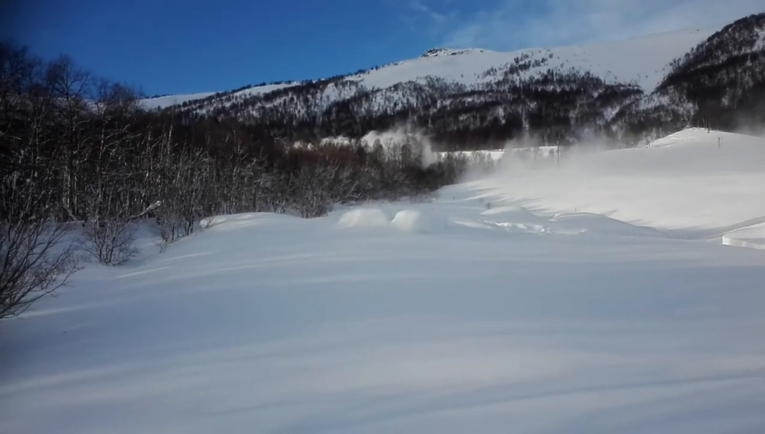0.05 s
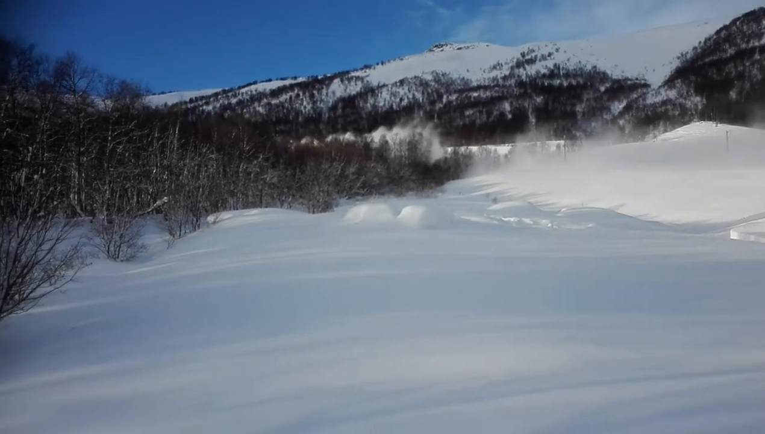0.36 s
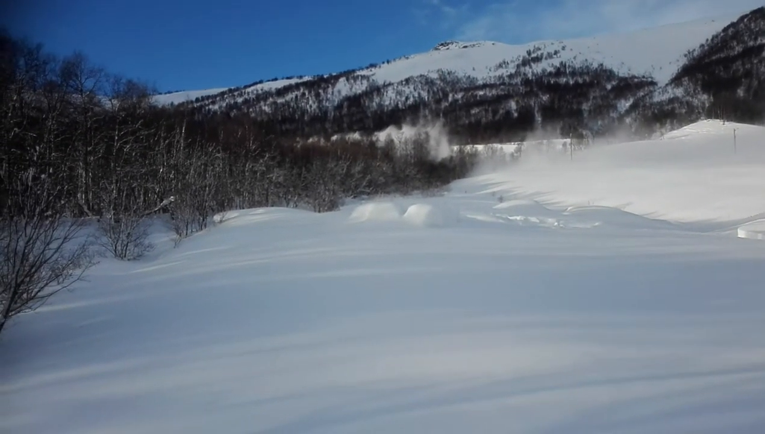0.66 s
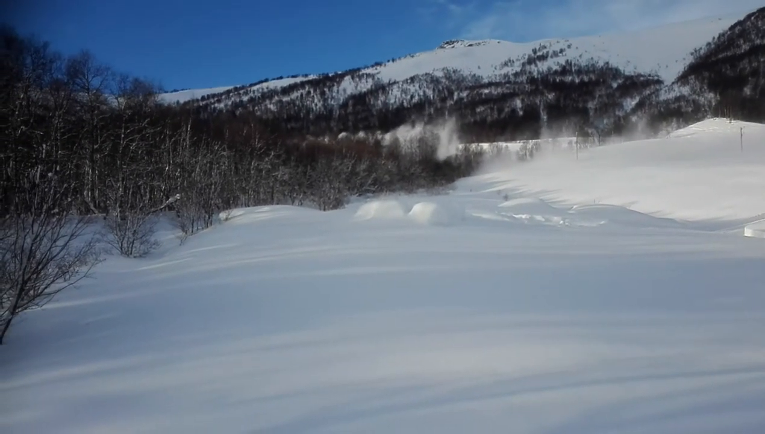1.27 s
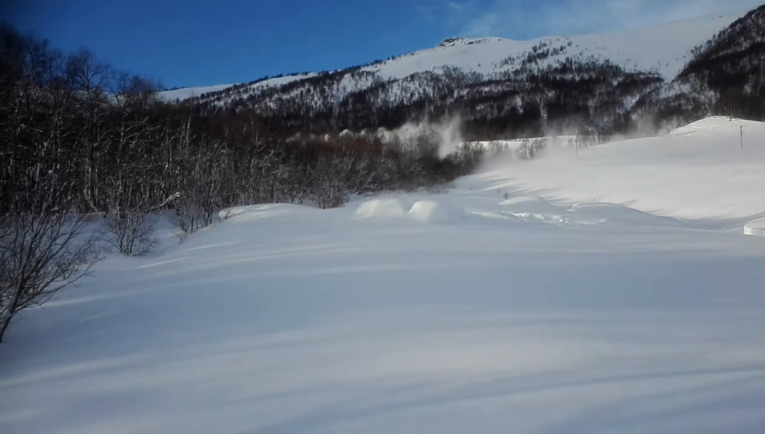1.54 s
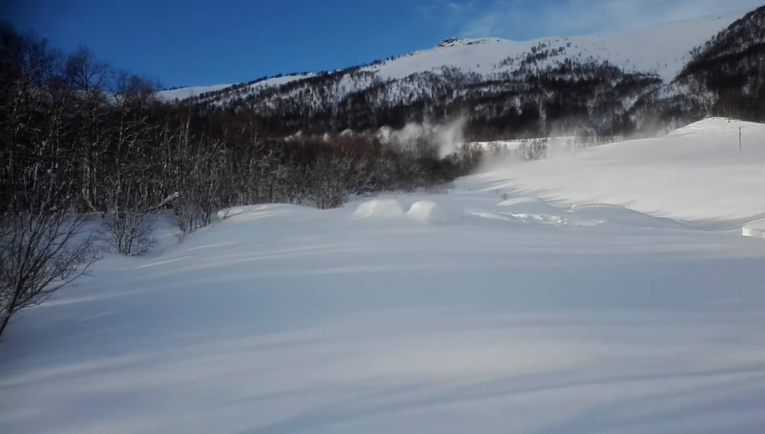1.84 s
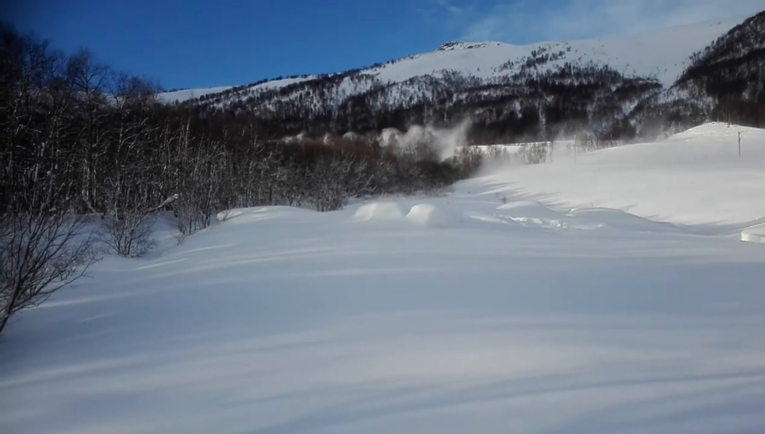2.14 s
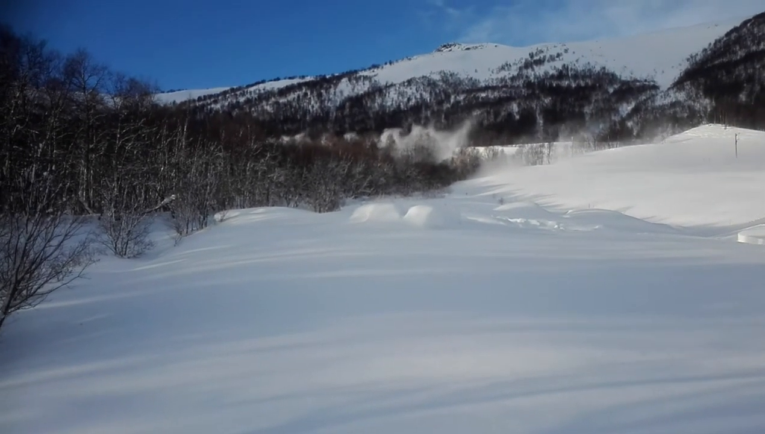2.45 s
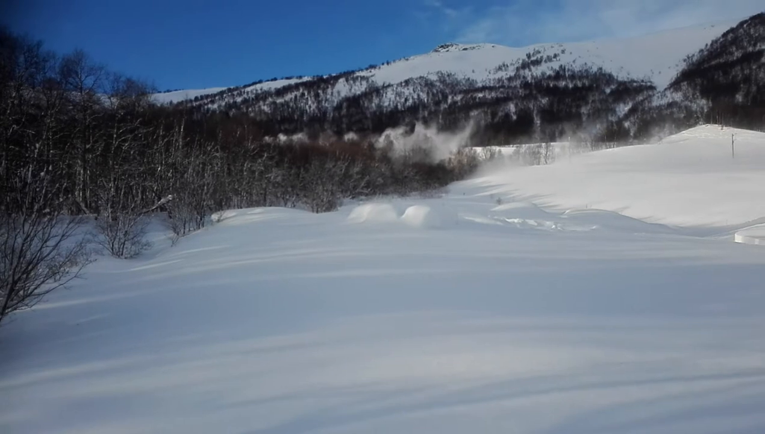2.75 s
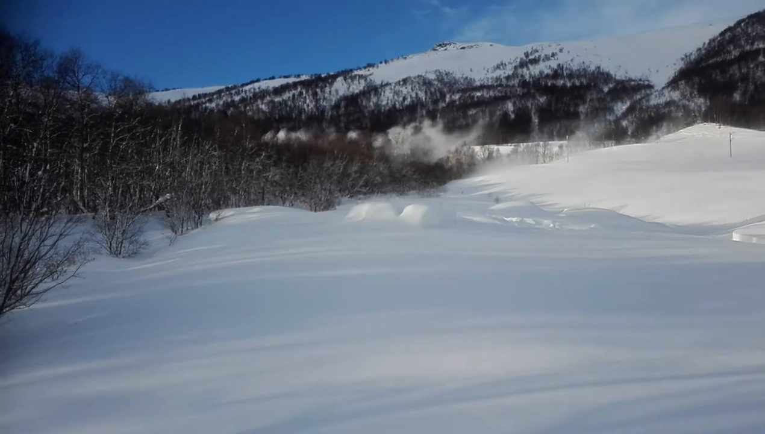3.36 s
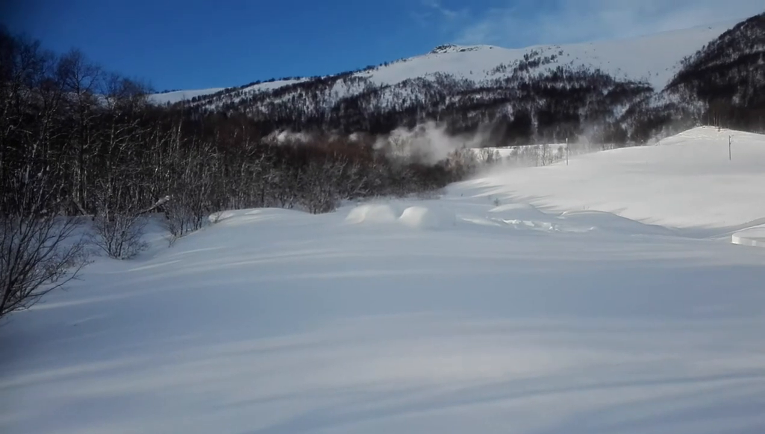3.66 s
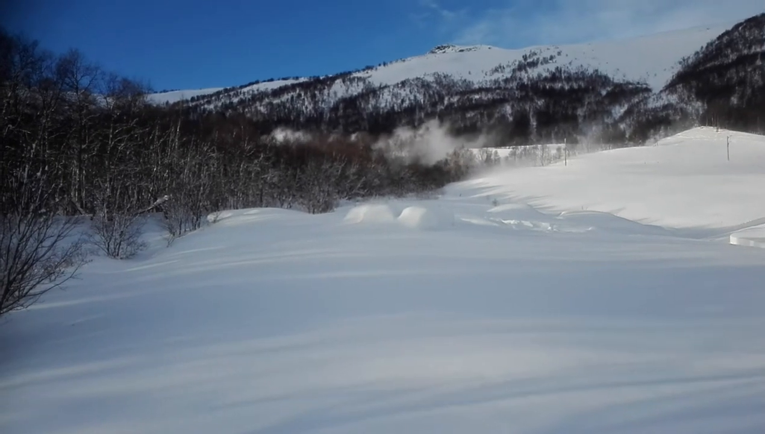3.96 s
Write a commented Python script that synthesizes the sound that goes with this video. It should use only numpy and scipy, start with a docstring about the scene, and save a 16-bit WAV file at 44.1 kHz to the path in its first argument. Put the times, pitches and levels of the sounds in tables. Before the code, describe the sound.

A low, wavering drone of far-off diesel engines carries over a snowfield. A hissing gust rises and fades, then a brighter one follows with brief whistles, as wind rumbles and thuds harder against the microphone.

```python
"""From the start two far diesel engines drone across a snowy valley; they run at slightly different
speeds, so their exhaust harmonics beat. About a second in, a gust sweeps loose snow over the slope
with a hiss that brightens as it grows, and brief airy whistles come and go. From two seconds on,
the eddies that buffet the microphone thud harder. A second, brighter gust peaks near 2.5 s
and sinks back while the drone and the thuds go on."""
import sys
import numpy as np
from scipy import signal
from scipy.fft import rfft, irfft
from scipy.io import wavfile
from scipy.ndimage import uniform_filter1d

SR = 44100
rng = np.random.default_rng(int(sys.argv[2]) if len(sys.argv) > 2 else 0)


def store_wav(level_fs):
    """Save 16-bit WAV to argv[1]."""
    pcm = np.round(np.clip(np.atleast_2d(level_fs), -1, 1) * 32767)
    wavfile.write(sys.argv[1], SR, pcm.T.astype(np.int16))


N = 176400
TIME, FREQ = np.arange(N) / SR, np.fft.rfftfreq(N, 1 / SR)

# Spectrum of the engines' diffuse roar: frequency_hz, relative_db
ROAR_SPECTRUM = [(20, -38.5), (85, -19), (120, -11), (160, -8.5), (215, 0.5), (300, -2.5), (360, -12),
                 (500, -13.5), (700, -23), (1500, -48.5)]


def engines():
    """Beating: harmonics of two nearly equal cycle rates interfere, over a dull roar and a faint whine."""
    # Exhaust harmonics of each engine: multiple_of_cycle_rate, level_db
    slow_harmonics = [(12, -49.5), (18, -73), (20, -58.5), (22, -53.5), (24, -52.5), (26, -60.5),
                      (28, -63.5), (30, -51.5), (32, -71), (33, -74), (34, -55.5), (36, -74), (42, -63),
                      (48, -65)]
    fast_harmonics = [(12, -48.5), (14, -59.5), (18, -55.5), (21, -52.5), (22, -52), (24, -60), (26, -60.5),
                      (28, -68), (34, -72), (43, -60.5), (48, -69.5)]
    # How the wind carries the engines' body and, differently, their deep firing tones: time_s, gain_db
    body_carry = [(0, 1.5), (.65, 2), (1.3, -.5), (1.8, -2.5), (2.2, 0), (2.6, 0), (3.4, -1), (4, -1.5)]
    firing_carry = [(0, 2), (.7, 0.5), (1.4, -2), (1.75, -4.5), (2.1, 2), (2.55, 4.5), (3, 1), (3.45, -8),
                    (3.9, 4)]
    # A higher engine tone that comes and goes: time_s, level_db
    whine_level = [(0, -55), (.45, -69.5), (1.2, -59.5), (1.5, -61.5), (1.9, -81), (2.5, -73), (3, -61),
                   (3.3, -74), (3.7, -60), (4, -74)]
    slow_cycle_hz, fast_cycle_hz, cylinders, speed_wander = 9.296, 9.743, 12, 0.00083
    phases = rng.random(size=128)
    exhaust, weak_lines = np.zeros(N), np.zeros(N)
    for cycle_hz, harmonics in ((slow_cycle_hz, slow_harmonics), (fast_cycle_hz, fast_harmonics)):
        clock = TIME + speed_wander * np.cumsum(drift(rate_hz=1.74)) / SR
        for order, level_db in harmonics:
            partial = gain_of(level_db) * distant_tone(order * cycle_hz, clock, phases[order], 0.73)
            exhaust += partial * envelope(firing_carry if order == cylinders else body_carry)
        weak_lines += cylinder_clatter(cycle_hz, clock)
    # The whine drifts in pitch with the same slow speed wander as the engines.
    whine = envelope(whine_level) * distant_tone(612.9, clock, rng.random(), fading_db=8)
    roar = gain_of(-47.5) * noise(colour(ROAR_SPECTRUM)) + gain_of(-51) * unit_rms(weak_lines)
    return exhaust + roar * envelope(body_carry) + whine


def distant_tone(pitch_hz, clock, phase_turns, fading_db):
    """Atmospheric fading: moving air makes the level of a far partial waver."""
    fading = gain_of(fading_db * drift(rate_hz=1.25))
    return np.sqrt(2) * np.sin(2 * np.pi * (pitch_hz * clock + phase_turns)) * fading


def cylinder_clatter(cycle_hz, clock, size=4096, spread_db=3.5):
    """Periodicity: uneven cylinders repeat one dull pattern every cycle, giving many spectral lines."""
    line_hz = np.fft.rfftfreq(size, 1 / size) * cycle_hz
    unevenness = gain_of(spread_db * rng.standard_normal(len(line_hz)))
    amplitudes = np.interp(line_hz, FREQ, colour(ROAR_SPECTRUM)) * unevenness
    cycle = irfft(amplitudes * np.exp(2j * np.pi * rng.random(len(line_hz))))
    return unit_rms(np.interp(clock * cycle_hz, np.arange(size) / size, cycle, period=1))


def gusts():
    """Flow noise: wind and drifting snow sound in four broad bands that swell with each gust."""
    # Course of the low rush, middle sough, treble hiss and top fizz: time_s, relative_db
    rush_level = [(0.0, -49.5), (0.41, -58), (1.1, -47.5), (1.56, -61), (1.66, -62), (2.38, -58.5),
                  (2.61, -43.5), (2.66, -47), (2.97, -54), (2.98, -46.5), (3.49, -56.5), (3.56, -53.5),
                  (3.84, -50), (3.95, -56), (3.97, -56.5)]
    sough_level = [(0.0, -43), (0.08, -50), (0.39, -57), (0.49, -54), (0.56, -61.5), (1.05, -43),
                   (1.37, -60), (1.65, -55), (1.91, -61.5), (1.95, -61), (2.12, -59.5), (2.19, -61),
                   (2.53, -43.5), (3.19, -54.5), (3.39, -53), (3.44, -56.5), (3.75, -50), (3.97, -49.5)]
    hiss_level = [(0.02, -65.5), (0.22, -74), (0.34, -75), (0.79, -61), (0.8, -65), (1.03, -57.5),
                  (1.45, -76), (1.6, -68), (1.7, -75), (2.02, -70.5), (2.54, -55), (3.0, -62.5),
                  (3.14, -71.5), (3.33, -67.5), (3.42, -72), (3.72, -67.5), (3.77, -74), (3.97, -73)]
    fizz_level = [(0.02, -79), (0.06, -73), (0.58, -77.5), (1.09, -70), (1.33, -80), (1.48, -78.5),
                  (1.59, -72), (1.98, -77.5), (2.33, -68.5), (2.48, -60), (2.97, -71), (3.15, -80),
                  (3.89, -74.5), (3.97, -77)]
    # Spectra of the same bands: frequency_hz, relative_db
    rush_spectrum = [(200, -27), (420, -2.5), (600, 2), (780, 2.5), (900, -2), (1030, 0), (1200, -26),
                     (2000, -33), (5000, -54)]
    sough_spectrum = [(500, -41), (1080, -5.5), (1260, 2), (1400, -0.5), (1550, -0.5), (1820, -2),
                      (1980, -10), (2200, -8), (2450, -28.5), (5000, -66)]
    hiss_spectrum = [(900, -28), (1800, -3), (2200, 2.5), (2470, -1.5), (2780, 2.5), (3130, -5.5),
                     (3400, -3), (3700, -11), (4200, -28.5), (6000, -51)]
    fizz_spectrum = [(2800, -23), (3500, -1.5), (3800, -0.5), (4100, 0), (4400, -7), (4950, -9),
                     (5200, -14), (5450, -14.5), (5900, -25.5), (8000, -46)]
    rush = gain_of(-2) * envelope(rush_level) * patchy_noise(rush_spectrum, depth_db=2.5)
    sough = envelope(sough_level) * patchy_noise(sough_spectrum, depth_db=2.5)
    hiss = gain_of(2.5) * envelope(hiss_level) * patchy_noise(hiss_spectrum, depth_db=0.6)
    fizz = gain_of(1) * envelope(fizz_level) * patchy_noise(fizz_spectrum, depth_db=0.6)
    return rush + sough + hiss + fizz


def whistles():
    """Resonance: narrow bands of the wind's noise sound for a moment as airy pitches."""
    # Brief whistles: centre_s, half_length_s, pitch_hz, width_hz, level_db
    resonances = [(0.153, 0.17, 2900, 200, -68), (.9, 0.29, 1400, 130, -53.5), (1.592, .05, 2840, 45, -63),
                  (1.753, 0.19, 1570, 130, -60), (2.19, 0.14, 2220, 80, -62), (2.542, 0.13, 1280, 70, -49),
                  (2.5, .13, 4750, 250, -68.5), (2.64, 0.25, 3380, 200, -61), (3.13, 0.11, 2140, 70, -72),
                  (3.796, 0.21, 1820, 160, -62)]
    out = np.zeros(N)
    for centre_s, half_length_s, pitch_hz, width_hz, level_db in resonances:
        swell = np.exp(-((TIME - centre_s) / half_length_s) ** 2)
        response = 1 / (1 + ((FREQ - pitch_hz) / width_hz) ** 2 / 2) ** 2
        out += gain_of(level_db) * swell * noise(response)
    return out


def buffeting(low_cut_hz=30.6):
    """Turbulent pressure: eddies at the microphone make a lumpy rumble with a few stronger thuds."""
    # Strength of the turbulence: time_s, level_db
    turbulence = [(0, -46.5), (.15, -57.5), (.5, -51), (.8, -64), (1, -45.5), (1.3, -47.5), (1.7, -42.5),
                  (1.92, -48), (2.2, -39), (2.55, -35.5), (2.8, -50.5), (3, -39.5), (3.1, -43),
                  (3.22, -42.5), (3.48, -38), (3.65, -41.5), (4, -37.5)]
    # Spectrum of the eddies: frequency_hz, relative_db
    eddy_spectrum = [(8, -18), (20, 6), (35, -1.5), (60, -1.5), (100, -8), (160, -8.5), (300, -46),
                     (700, -59), (2000, -82)]
    # Strong buffets: centre_s, half_length_s, level_db, corner_hz
    buffets = [(0.055, 0.021, -41.5, 69.5), (1.438, 0.013, -32, 133), (2.148, 0.026, -27.5, 81),
               (2.287, .03, -30, 85), (2.638, 0.024, -33, 131), (3.319, 0.021, -34.5, 78.4),
               (3.453, 0.02, -35.5, 85), (3.845, 0.015, -30, 92), (3.982, 0.011, -21, 173)]
    rumble = noise(colour(eddy_spectrum)) * gain_of(-0.5 * drift(rate_hz=14))
    out = envelope(turbulence) * unit_rms(rumble)
    for centre_s, half_length_s, level_db, corner_hz in buffets:
        window = np.exp(-.5 * ((TIME - centre_s) / half_length_s) ** 2)
        bass_band = FREQ / (FREQ + low_cut_hz) / np.hypot(1, (FREQ / corner_hz) ** 3.45)
        thud = window * noise(bass_band)
        out += gain_of(level_db) * thud * np.linalg.norm(window) / np.linalg.norm(thud)
    return out


def patchy_noise(spectrum, depth_db, size=1024):
    """Random modulation: patches of a noise spectrum, a few hundred Hz wide, swell and fade."""
    spectrogram = signal.stft(noise(colour(spectrum)), nperseg=size)[2]
    patches = rng.standard_normal(spectrogram.shape)
    for _ in range(2):
        patches = uniform_filter1d(patches, size=4, axis=0)  # across frequency
        patches = uniform_filter1d(patches, size=10, axis=1)  # along time
    spectrogram *= gain_of(depth_db * unit_rms(patches))
    return unit_rms(signal.istft(spectrogram, nperseg=size)[1][:N])


def noise(response):
    """Spectral shaping: white noise filtered by a gain over frequency, at unit rms."""
    return unit_rms(irfft(rfft(rng.standard_normal(N)) * response, N))


def drift(rate_hz):
    """Low-pass noise: slow random motion up to about the given rate."""
    return noise((FREQ > 0) * np.exp(-(FREQ / rate_hz) ** 2))


def colour(points):
    """Frequency response through (frequency_hz, gain_db) points, with a roll-off above the last."""
    hz, db = np.transpose(points)
    response = gain_of(np.interp(np.log(FREQ + 1), np.log(hz + 1), db))
    return response / (1 + (FREQ / (2 * hz[-1])) ** 2)


def envelope(points):
    """Amplitude over time through (time_s, level_db) points."""
    return gain_of(np.interp(TIME, *np.transpose(points)))


def gain_of(db):
    """Decibels to amplitude."""
    return 10 ** (np.asarray(db) / 20)


def unit_rms(x):
    """Normalisation to unit mean power."""
    return x / np.sqrt(np.mean(x ** 2) + 1e-20)


def scene():
    """Superposition: far engines, wind on the slope and eddies at the microphone add in one channel."""
    return (engines() + gusts() + whistles() + buffeting())[None]


def record(dry, floor_db=-79.5, edge_hz=14250):
    """Noise floor and bandwidth: faint electronic hiss is added, then a low-pass cuts the top treble."""
    hissy = dry + gain_of(floor_db) * rng.standard_normal(dry.shape)
    low_pass = signal.firwin(511, edge_hz, window=("kaiser", 9), fs=SR)
    return signal.oaconvolve(hissy, low_pass[None], "same")


dry = scene()
out = record(dry)
store_wav(out)
```